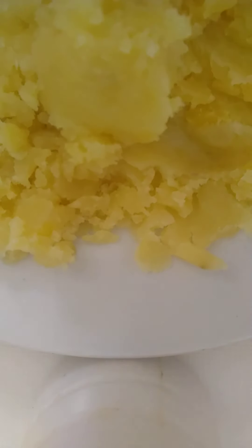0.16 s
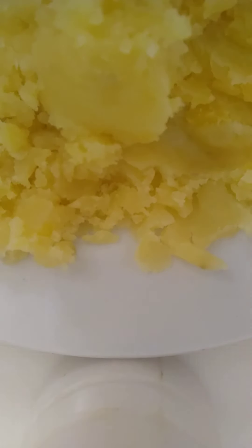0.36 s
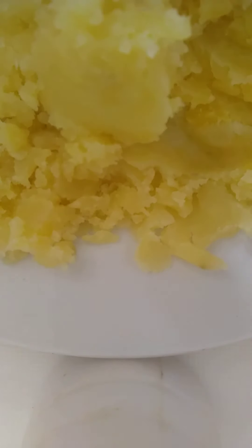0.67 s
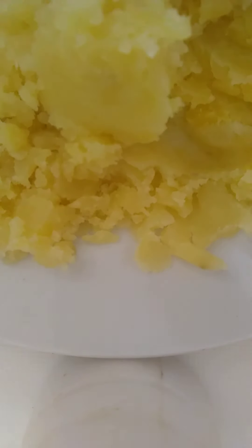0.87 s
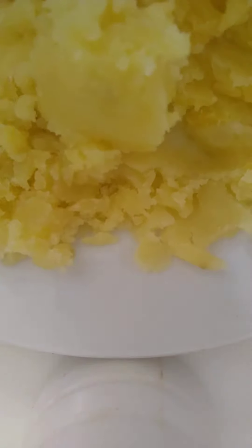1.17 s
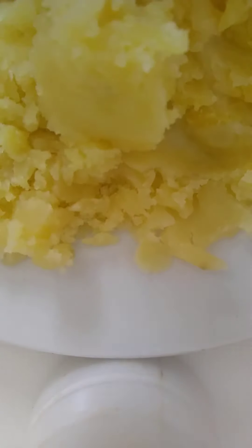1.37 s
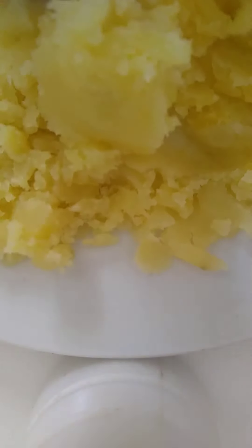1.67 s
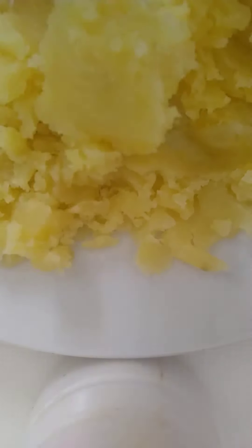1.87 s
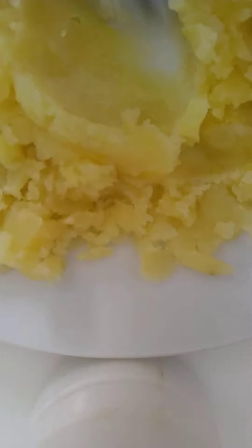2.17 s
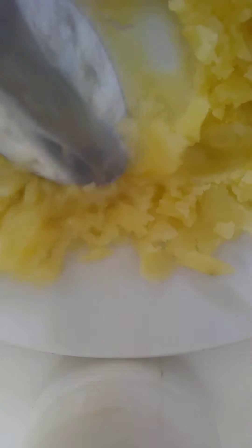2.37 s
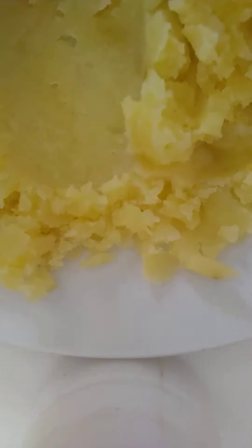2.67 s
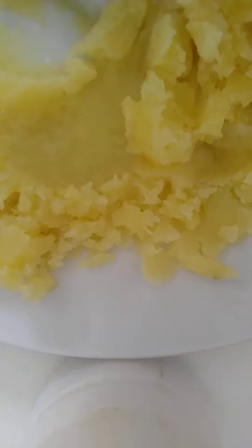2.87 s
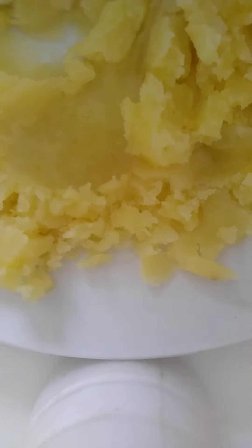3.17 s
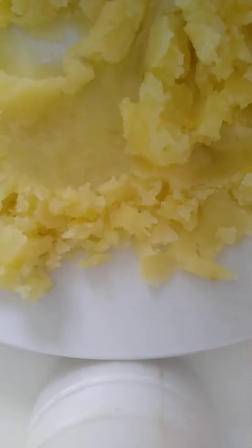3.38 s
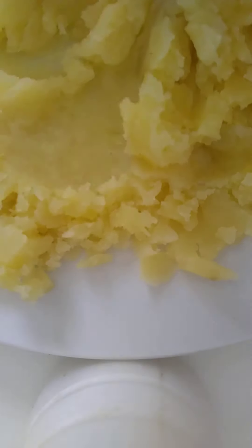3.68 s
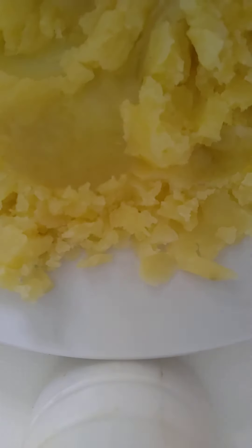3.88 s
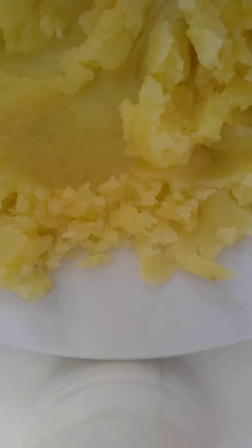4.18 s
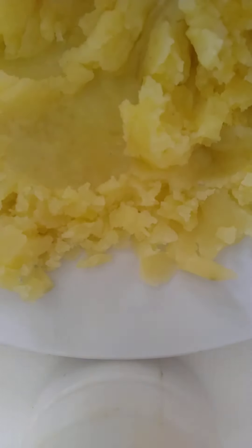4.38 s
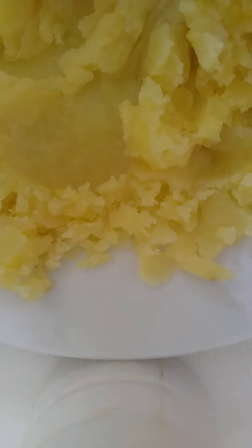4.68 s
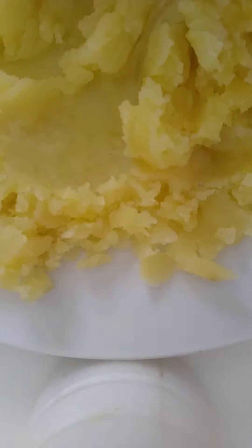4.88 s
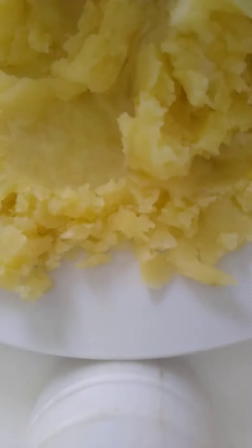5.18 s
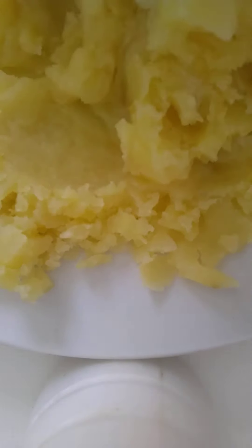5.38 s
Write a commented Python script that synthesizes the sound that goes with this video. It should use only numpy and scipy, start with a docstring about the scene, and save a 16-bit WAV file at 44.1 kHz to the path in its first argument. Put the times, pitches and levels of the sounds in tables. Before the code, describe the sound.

Very close stereo microphone on a table in a small, short-echo kitchen. Low cushioned thumps of plate and table carry gritty crushing and dull knocks, followed by dry steel ticks on glaze. Strokes are uneven, densest near the middle, sparse and soft afterwards, with a clear ring near the end. Small sticky smears and hiss fill the gaps over low rumble and hum.

```python
"""Boiled potatoes are mashed with a steel utensil on a ceramic plate in a kitchen, over air noise and an appliance hum.
Spreading mash hisses and the table rumbles from the start; modal thumps of plate and table soon follow, with
a gritty crush and short dull mid-range knocks (noise bursts). Steel then ticks on the glaze after sinking through
the potato, damped or ringing as the film allows; wet smears (torn films), a few squeaks (stick-slip) and lift-off
sucks come in between. Two ports pick this up; a gain control ducks on loud peaks and creeps back up."""
import sys
import numpy as np
from scipy import signal
from scipy.fft import rfft, irfft
from scipy.io import wavfile
from scipy.ndimage import uniform_filter1d, minimum_filter1d

SR = 44100
rng = np.random.default_rng(int(sys.argv[2]) if len(sys.argv) > 2 else 0)


def unload_wav(signal):
    """Save mono or channel-first audio to the path in sys.argv[1] as 16-bit WAV at rate SR, clipped to [-1, 1]."""
    wavfile.write(
        sys.argv[1],
        SR,
        np.round(np.clip(np.atleast_2d(signal).T, -1, 1) * 32767).astype(np.int16),
    )


N = 244314
T = np.arange(N) / SR
FREQS = np.fft.rfftfreq(N, 1 / SR)

# strokes that cut through to the glaze: (time [s], thump level [dB], extra level of slow table modes [dB],
# depth of potato under the steel [mm], level of the catch on a lump [dB], level of the tick on the glaze [dB])
STROKES = [(0.3349, -16, -17, 0.14, -60, -15), (0.3365, -9, -8, 0.9, -39, -9),
           (1.572, 1.5, -2, 6.7, -38, -21.5), (1.889, -8, 5, 3.3, -24, -9), (2.0403, 0, -2, 9.4, -50, -9.5),
           (2.147, -18.5, 18, 1.1, -23, -23), (2.384, 8, -7, 9.8, -11.5, -8.5),
           (2.589, -10.5, 9.5, 1.54, -25, -11), (2.621, -34, 12, 1.5, -43, -27),
           (2.727, 7.5, -5.5, 8.4, -12, -9.5), (4.272, -11.5, -7, 1.2, -16.5, -22.5),
           (4.5256, 2, 1.5, 0.055, -28, 4.5), (5.277, -19.5, -2, 0.72, -34, -9),
           (5.283, 7.5, -6, 7.9, -27, -12), (5.311, -26, 5, 0.66, -25, -8)]
THICK_PUSH_MS = 2.1  # a longer push means thick potato


def amp(db):
    """Level to amplitude ratio: 20 dB is a factor of ten."""
    return 10 ** (np.asarray(db) / 20)


def across(points):
    """Interpolation of (frequency [Hz], value) points along a logarithmic frequency axis."""
    hz, value = np.transpose(points)
    return np.interp(np.log(FREQS + 1), np.log(hz), value)


def colour(x, points):
    """Zero-phase filtering: weight the spectrum by (frequency [Hz], gain [dB]) points."""
    return irfft(rfft(x) * amp(across(points)), N)


def response(points):
    """Minimum-phase impulse response of a body, from its gain curve by folding the cepstrum."""
    cepstrum = irfft(np.log(amp(across(points))), N)
    cepstrum[1:N // 2] *= 2
    cepstrum[N // 2 + 1:] = 0
    return irfft(np.exp(rfft(cepstrum)), N)[:SR // 50]


def unit(x):
    """Normalisation to a standard deviation of 1."""
    return x / np.std(x)


def walk(rate):
    """Random modulation: straight lines join about `rate` chance values a second, with a spread near 1."""
    k = int(SR / rate)
    steps = np.repeat(rng.standard_normal(N // k + 1), k)
    return 1.3 * uniform_filter1d(steps, k)[:N]


def fader(points):
    """Amplitude envelope: (time [s], level [dB]) points joined linearly in decibels."""
    return amp(np.interp(T, *np.transpose(points)))


def swells(rows):
    """Sum of Gaussian envelopes: (centre [s], standard deviation [s], peak level [dB])."""
    return sum(amp(db) * np.exp(-.5 * ((T - s) / half) ** 2) for s, half, db in rows)


def add(track, s, sound):
    """Superposition of a sound on the track from time s."""
    i = int(s * SR)
    track[i:i + len(sound)] += sound[:N - i]


def room(x, t60, wet_db, gap_s):
    """Diffuse reverberation: decaying noise that builds up after the first wall is reached."""
    t = T[:SR // 2]
    decay = np.exp(-np.log(1000) * t / t60)
    build_up = 1 - np.exp(-(t / gap_s) ** 2)
    tail = rng.standard_normal(len(t)) * decay * build_up
    return amp(wet_db) * signal.fftconvolve(x, tail / np.linalg.norm(tail))[:N]


def crackle(decay_s):
    """Impulsive noise: cubed chance values make a spiky burst that dies away exponentially, with energy 1."""
    t = T[:SR // 20]
    force = rng.standard_normal(len(t)) ** 3 * np.exp(-t / decay_s)
    return force / np.linalg.norm(force)


def kitchen():
    """Broadband air noise, partly in antiphase at the ports, and narrowband appliance hum with wavering tones."""
    # room air: (frequency [Hz], spectral density [dB per Hz])
    air_density = [(20, -141), (55, -68), (140, -72.5), (260, -68), (400, -73.5), (560, -73.5),
                   (800, -76.5), (1050, -82), (1500, -84), (3000, -90), (5000, -96), (7000, -105),
                   (12000, -102), (15000, -106)]
    # diffuse share of the air noise, unlike at the two ports: (frequency [Hz], level against the air [dB])
    diffuse_share = [(100, -1.5), (300, -4.5), (520, -1), (1000, -18.5), (2300, -27), (4500, -18),
                     (7000, 4), (12000, -5.5)]
    # appliance tones: (frequency [Hz], mean level [dB])
    hum_tones = [(59, -53.5), (140, -44), (264, -54.5), (530, -52.5), (597, -57.5), (808, -60)]
    # white noise of variance 1 has a density of 2 / SR per Hz
    air, apart = colour(rng.standard_normal((2, N)), air_density) * np.sqrt(SR / 2)
    apart = colour(apart, diffuse_share)
    hum = np.zeros(N)
    for hz, db in hum_tones:
        gain = amp(db + 2 * walk(11)) * np.sqrt(2)
        pitch = hz * (1 + 0.0079 * walk(60))
        hum += gain * np.sin(2 * np.pi * np.cumsum(pitch) / SR)
    return air * amp(.5 * walk(19.0)) + hum + np.array([apart, -apart])


def leaning():
    """Low-frequency structure-borne noise: the table rumbles under the working hand."""
    # table under the hand: (frequency [Hz], gain [dB])
    lean_colour = [(20, -26), (45, 8.5), (65, 3.5), (100, -4), (150, -13.5), (240, 4), (400, -70),
                   (1000, -124)]
    # rumble: (time [s], level [dB])
    rumble = [(0, -34.5), (.5, -45), (.66, -39), (.9, -77), (1.35, -37.5), (1.68, -38.5), (1.8, -40),
              (1.95, -35), (2.7, -32.5), (2.98, -40), (3.17, -80), (3.57, -26.5), (3.78, -71), (3.98, -35),
              (4.65, -40), (4.8, -35.5), (5.54, -38)]
    return unit(colour(rng.standard_normal(N), lean_colour)) * fader(rumble)


def mash():
    """Impulsive noise of tearing wet films, and stick-slip squeaks on the steel as rough rising tones."""
    # wet films: (frequency [Hz], gain [dB])
    smear_colour = [(500, 2), (2000, 17), (4000, 7), (6000, 8.5), (9000, 5), (12500, 5.5), (15000, -50)]
    # separate wet smears and lift-off sucks of the steel: (centre [s], standard deviation [s], peak level [dB])
    smears = [(.65, 0.014, -53), (1.13, 0.032, -55), (1.265, 0.0062, -49), (1.46, 0.026, -59),
              (2.155, 0.0089, -49), (2.235, 0.022, -58), (2.9, 0.011, -46), (3.275, 0.015, -47.5),
              (3.54, 0.028, -54), (3.97, 0.011, -46.5), (4.35, 0.0046, -49), (4.72, 0.022, -47),
              (4.96, 0.066, -51), (5.125, 0.041, -54), (5.27, 0.032, -55), (5.48, 0.019, -69)]
    # soft hiss of spreading mash: (time [s], level [dB])
    spreading = [(0, -58), (.27, -60.5), (.36, -48.5), (.47, -53), (.8, -70.5), (1.27, -63.5), (2.1, -63),
                 (3.1, -90), (3.9, -58), (4.22, -67.5), (4.45, -70), (5.54, -60.5)]
    # squeaks of the steel: (centre [s], standard deviation [s], pitch at the centre [Hz], peak level [dB])
    squeaks = [(0.335, 0.002, 5540, -29.5), (1.171, 0.0376, 3420, -55.5), (3.134, 0.05, 1910, -51.5)]
    tears_per_s, tear_spread_db = 2500, 12  # films tear at random, with scattered sizes
    scatter_db = -26  # the mash is so close that little of its sound arrives by the walls
    flutter_db, flutter_per_s = 3.5, 26  # the spreading mash sticks and gives way
    grain_db, grain_per_s = 2.5, 160  # the films tear in little bunches
    rise, rough = 0.042, 0.034  # shares of the pitch: rise under growing pressure, jitter

    tears = (rng.random(N) < tears_per_s / SR) * rng.standard_normal(N)
    pops = tears * amp(tear_spread_db * np.minimum(rng.exponential(size=N), 4))
    wet = unit(colour(unit(pops) + 2.7 * rng.standard_normal(N), smear_colour))
    scattered = unit(colour(rng.standard_normal((2, N)), smear_colour))
    flutter = amp(flutter_db * walk(flutter_per_s))
    envelope = swells(smears) + swells(lifts()) + fader(spreading) * flutter
    out = (wet + amp(scatter_db) * scattered) * envelope
    out = out * amp(grain_db * walk(grain_per_s))
    for s, half, hz, db in squeaks:
        pitch = hz * (1 + rise * np.tanh((T - s) / half) + rough * walk(700))
        rasp = np.sin(2 * np.pi * np.cumsum(pitch) / SR) * amp(2 * walk(100))
        out += unit(rasp) * swells([(s, half, db)])
    return out


def thumps():
    """Modal excitation: a smooth push rings plate and table, a longer one only the low modes; a lump is crushed."""
    # plate and table moving together: (frequency [Hz], level [dB], decay time T60 [s])
    table_modes = [(50, -47, 0.17), (112, 0.5, 0.14), (148.2, 6, 0.044), (198.6, 5, 0.038),
                   (232.8, 5.5, 0.054), (269, -3, 0.028), (337, -13, 0.055), (429, -14.5, 0.088),
                   (528, -28, 0.1), (602.5, -19.5, 0.072), (1035, -16, 0.024)]
    # gritty crush of the lump: (frequency [Hz], gain [dB])
    crush_colour = [(30, -2.5), (90, 6.5), (200, 21.5), (400, 0.5), (700, -6), (1100, -14), (1700, -18),
                    (2800, -27), (4000, -40), (8000, -60)]
    # long tail of the kitchen: (frequency [Hz], gain [dB])
    boom_colour = [(50, -20), (110, 6), (160, 3), (240, -6.5), (380, -7.5), (600, -8)]
    slow_below_hz, pitch_spread = 160, 0.041  # limit of the slow modes; chance share of each frequency
    crush_db, crush_db_per_db = 12, 1.72  # crush level at a 0 dB thump, and its rise with force
    wall_echo_s, wall_db = 0.027, -32  # the far wall returns each thump

    out, t = np.zeros(N), T[:SR // 3]
    crumble = response(crush_colour)
    hits = landings()
    chances = rng.standard_normal((len(hits), len(table_modes)))
    for (s, db, rock_db, push_ms), chance in zip(hits, chances):
        ring = np.zeros(len(t))
        for (hz, mode_db, t60), c in zip(table_modes, chance):
            level = amp(mode_db + rock_db * (hz < slow_below_hz))
            decay = np.exp(-np.log(1000) * t / t60)
            ring += level * decay * np.sin(2 * np.pi * hz * (1 + pitch_spread * c) * t)
        ring = ring * (1 - np.exp(-t / 0.004))  # the table takes a moment to get moving
        push = np.sin(np.pi * np.minimum(t[:SR // 25] * 1000 / push_ms, 1)) ** 2
        # the air follows the speed of the surface
        sound = np.gradient(signal.fftconvolve(ring, push))[:len(t)]
        add(out, s, amp(db) * sound / np.abs(sound).max())
        lump = min(push_ms / THICK_PUSH_MS, 1)  # thin potato leaves less to crush
        crush = signal.fftconvolve(crackle(decay_s=0.0043), crumble)
        add(out, s, lump * amp(crush_db + crush_db_per_db * db) * crush)
    near = room(out, t60=0.11, wet_db=-6.0, gap_s=0.0017)
    wall = amp(wall_db) * np.interp(T - wall_echo_s, T, out)
    boom = room(colour(out, boom_colour), t60=0.41, wet_db=-7.0, gap_s=0.015)
    return out + near + wall + boom


def landings():
    """Cushioned impact: deeper potato lengthens the push; (time [s], thump [dB], slow modes [dB], push [ms])."""
    # soft presses that stop inside the potato:
    # (time [s], thump level [dB], extra level of slow table modes [dB], push length [ms])
    presses = [(0.179, -8, -2.5, 3.3), (0.577, -25.5, 6, 4), (1.066, -15.5, 4.5, 3.3), (1.518, -17, 4, 2.9),
               (1.873, -17.5, 8, 5.2), (2.868, -23, 9, 7.9), (3.021, -22, 3, 2.4), (3.29, -15.5, 11, 17.7),
               (3.515, -26, -10, 4.5), (3.884, -20, 3, 2.4), (3.941, -27.5, 6, 1.8), (4.118, -14.5, 6, 4.4),
               (4.168, -23.5, 4, 2.7), (4.262, -9.5, -9, 19)]
    bare_push_ms, push_ms_per_mm = 1, 0.21
    strokes = [(s, db, rock_db, bare_push_ms + push_ms_per_mm * depth)
               for s, db, rock_db, depth, _, _ in STROKES]
    return strokes + list(presses)


def knocks():
    """Filtered impulsive noise: short dull mid-range knocks that come with some of the landings."""
    # short dull knocks: (time [s], level [dB])
    knock_times = [(0.181, -7), (0.336, -0.5), (1.514, -5.5), (1.573, 4), (1.895, -5.5), (2.059, -5.5),
                   (2.148, -3.5), (2.393, -5), (2.737, -1), (3.883, -14), (5.284, 0.5)]
    # spectrum of a knock: (frequency [Hz], gain [dB])
    knock_colour = [(100, 11.5), (500, 5), (900, 6), (1600, -0.5), (2400, -8), (4000, -19.5), (12000, -23)]
    out, body = np.zeros(N), response(knock_colour)
    for s, db in knock_times:
        add(out, s, amp(db) * signal.fftconvolve(crackle(decay_s=0.0049), body))
    return out + room(out, t60=0.13, wet_db=-6.5, gap_s=0.011)


def ticks():
    """Contact damping: steel on bare glaze rings freely, but through the mash it gives only a dry crack."""
    # ring of plate and utensil: (frequency [Hz], level [dB], undamped decay time T60 [s])
    plate_modes = [(540, 1.5, .1), (600, -3, .08), (1200, -9, .06), (1510, 6, .035), (1600, 9, .024),
                   (1720, 9, .016), (1870, 7, .016), (2060, 4, .03), (2250, -3, .018), (2892, -3, .12),
                   (3010, -4, .08), (3118, -5, .08), (3785, -1, .07), (3880, 2, .05), (3945, 6, .06),
                   (4010, 3, .07), (4120, 0, .06), (4270, 2, .035), (4520, 3, .02), (4680, 5, .022),
                   (4900, 1, .03), (5032, 3, .03), (5300, 0, .03), (5510, -4, .045), (5720, -5, .045),
                   (5940, -2, .045), (6150, -6, .045), (6320, -8, .045), (7150, -9, .055), (7350, -8, .05),
                   (7560, -7, .045), (7760, -6, .05), (7920, -3, .055), (8180, -9, .1), (8310, -9, .11),
                   (8460, -8, .11), (8980, -13, .13), (9450, -10, .06), (9700, -13, .09), (10510, -3, .06),
                   (11150, -15, .1), (11300, -12, .09), (12230, -9, .08), (12380, -12, .1),
                   (12580, -10, .07), (14000, -15, .09), (14200, -10, .08)]
    # crack of the contact: (frequency [Hz], gain [dB])
    crack_colour = [(60, -34), (300, 7), (600, -1), (850, 5), (1150, 6), (1400, 13), (2100, 20),
                    (2400, 12.5), (2900, 14.5), (3550, 6), (4200, 13.5), (4800, 9.5), (5400, 3.5),
                    (7000, 1.5), (14000, -4.5)]
    # the steel meets the plate nearer to the left port, and each mode radiates its own way:
    # (frequency [Hz], gain at the left [dB])
    plate_left = [(550, 3.5), (1100, 2.5), (1600, -3.5), (2300, 0), (3000, 2), (3900, -0.5), (5000, -0.5),
                  (8000, 3), (12000, 5.5)]
    bare_hz, covered_hz = 12900, 4305  # a film of mash dulls the tick: low-pass corners
    covered_ring, ring_db = 0.048, -17.5  # share of ringing left under mash; level of the ring
    bare_crack_db = -32  # on bare glaze less of the blow goes into the gritty crack
    attack_s = 0.00032  # the blow takes a moment to spread across the plate
    lobe_scatter = .35  # radians by which a mode's arrival strays at each port

    out, t = np.zeros((2, N)), T[:SR // 4]
    damped = response(crack_colour)
    # neighbouring modes arrive a quarter turn apart, and a little differently at each port
    quarter_turns = -np.pi / 2 * np.arange(len(plate_modes))[:, None, None]
    lobes = quarter_turns + lobe_scatter * rng.standard_normal((len(plate_modes), 2, 1))
    waves = []
    for (hz, _, _), lobe in zip(plate_modes, lobes):
        # an uneven rim splits each mode into a beating pair
        beating = 1.22 + 0.21 * np.cos(2 * np.pi * 0.018 * hz * t)
        waves.append(np.sin(2 * np.pi * hz * t + lobe) * beating)
    for s, db, bare, skid_s in contacts():
        free = covered_ring + (1 - covered_ring) * bare ** 2
        bright_hz = covered_hz + (bare_hz - covered_hz) * bare
        ring = np.zeros((2, len(t)))
        for (_, mode_db, t60), wave in zip(plate_modes, waves):
            ring += amp(mode_db) * np.exp(-np.log(1000) * t / (t60 * np.sqrt(free))) * wave
        ring = ring * (1 - np.exp(-t / attack_s))
        # the edge skids before it grips
        crack = np.zeros(len(t))
        add(crack, 0, amp(bare_crack_db * bare) * signal.fftconvolve(crackle(decay_s=skid_s), damped))
        softening = signal.butter(1, bright_hz, fs=SR)
        sound = amp(db) * signal.lfilter(*softening, amp(ring_db) * free * ring + crack)
        add(out[0], s, sound[0])
        add(out[1], s, sound[1])
    out[0] = colour(out[0], plate_left)
    apart = room(out[1], t60=0.085, wet_db=-19.5, gap_s=0.0019)
    return out + room(out[0], t60=0.38, wet_db=-12.0, gap_s=0.002) + np.array([apart, -apart])


def contacts():
    """Sinking at steady speed: a lump, then the glaze; (time [s], level [dB], bareness [0-1], skid decay [s])."""
    sink_mm_per_s, catch_share = 540, 0.42  # the steel catches on a firm lump at this share of the depth
    film_mm = 0.29  # depth at which bareness has fallen to 1/e
    skid_s, grind_s = 0.0013, 0.0032  # a brief skid on the glaze, a longer grind through a lump
    rows = []
    for s, _, _, depth, catch_db, tick_db in STROKES:
        sink_s = depth / sink_mm_per_s
        rows.append((s + catch_share * sink_s, catch_db, 0, grind_s))
        rows.append((s + sink_s, tick_db, np.exp(-depth / film_mm), skid_s))
    return rows


def lifts():
    """Wet adhesion: steel sucks free after firm thick landings; (centre [s], standard deviation [s], level [dB])."""
    firm_db, after_s, half_s, lift_db = -17.5, 0.19, 0.0078, -57.5
    bounce_s = .05  # a contact this soon after a stroke is only its bounce
    rows = []
    for s, db, _, push_ms in landings():
        # a stroke that follows too soon leaves no time to lift off
        interrupted = any(s + bounce_s < row[0] < s + after_s for row in STROKES)
        if db > firm_db and push_ms > THICK_PUSH_MS and not interrupted:
            rows.append((s + after_s, half_s, lift_db))
    return rows


def scene():
    """Superposition of all sources as they reach the two ports."""
    return thumps() + knocks() + ticks() + mash() + leaning() + kitchen()


def gain_control(x, threshold_db, slope, release_db_per_s):
    """Dynamic compression, linked across ports: cut loud peaks at once, recover at a steady rate in decibels."""
    peak_db = 20 * np.log10(np.abs(x).max(axis=0) + 1e-9)
    over = np.maximum(peak_db - threshold_db, 0)
    recovery = release_db_per_s * T
    cut = np.maximum.accumulate(slope * over + recovery) - recovery
    # hold and smooth the gain over 400 samples around each moment
    return x * amp(uniform_filter1d(minimum_filter1d(-cut, size=400), size=400))


def record(dry):
    """Two-port reception: slow and quicker compression, a late inverted right port, soft clipping, low-pass."""
    # left port against right, beyond the plain delay: (frequency [Hz], phase [rad])
    port_phase = [(60, .1), (120, .2), (240, -.05), (380, -.2), (550, .7), (800, .4), (1100, 0),
                  (1500, -.3), (1900, 0)]
    # left port louder than the right: (frequency [Hz], level difference [dB])
    port_balance = [(60, -0.1), (250, 1.5), (550, 3), (1300, 2), (2300, 0.6), (4500, 0.3), (8000, 1.1),
                    (14000, 2)]
    port_lag_s = .000446
    levelled = gain_control(dry, threshold_db=-20.0, slope=0.35, release_db_per_s=8.0)
    left, right = gain_control(levelled, threshold_db=1.5, slope=0.7, release_db_per_s=16)
    turn = np.exp(-1j * (2 * np.pi * FREQS * port_lag_s + across(port_phase)))
    late_right = irfft(rfft(right) * turn * amp(-across(port_balance)), N)
    ports = np.array([left, -late_right])
    rounded = ports / (1 + ports ** 8) ** .125
    top_cut = signal.ellip(10, .2, 90, 14300, fs=SR, output="sos")  # ripple and stop band in dB, edge in Hz
    return signal.sosfilt(top_cut, rounded)


dry = scene()
out = record(dry)
unload_wav(out)
```